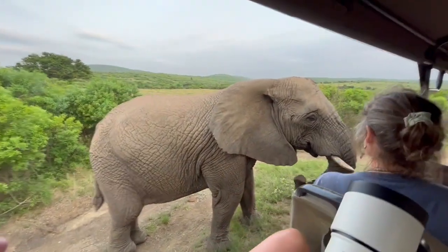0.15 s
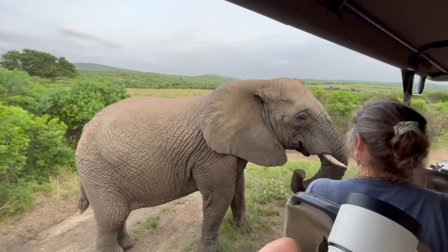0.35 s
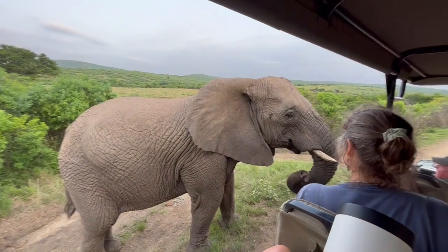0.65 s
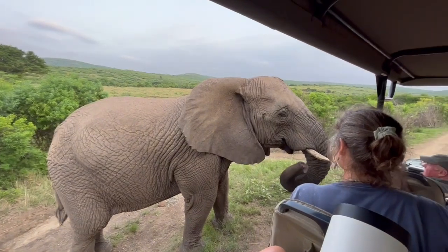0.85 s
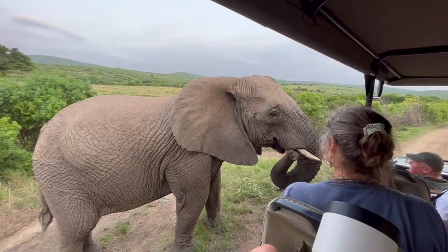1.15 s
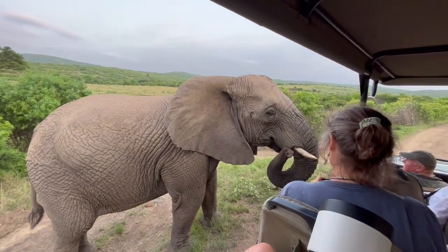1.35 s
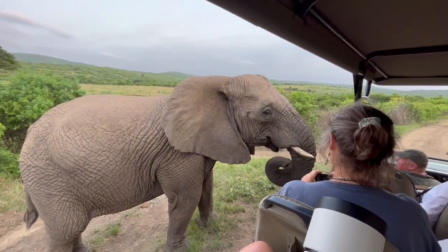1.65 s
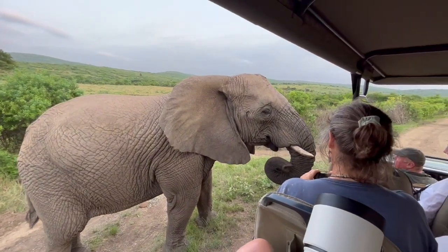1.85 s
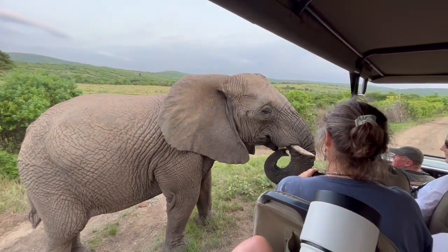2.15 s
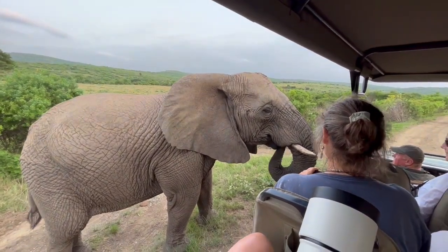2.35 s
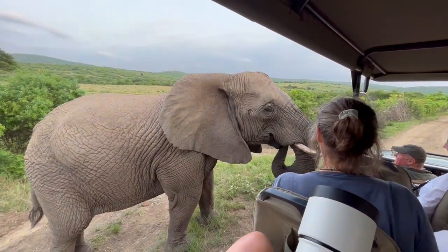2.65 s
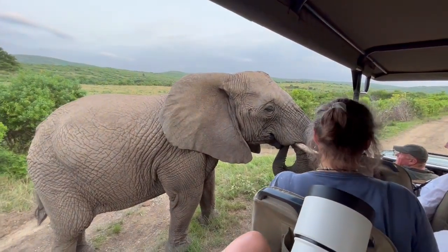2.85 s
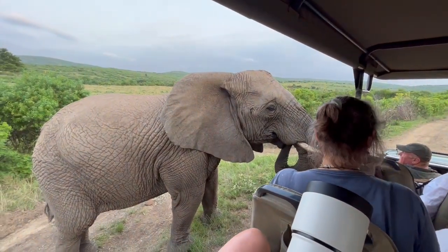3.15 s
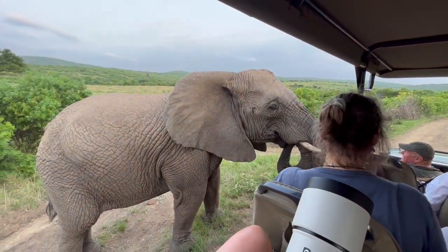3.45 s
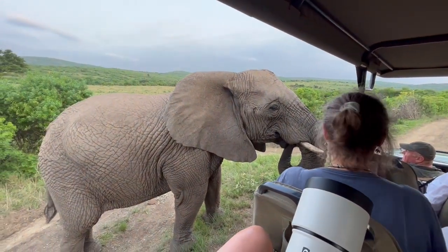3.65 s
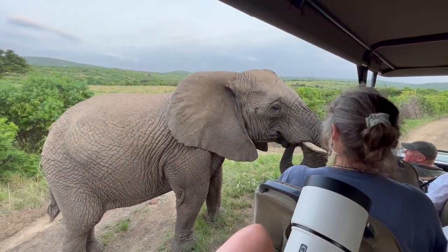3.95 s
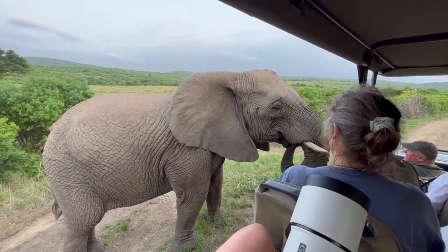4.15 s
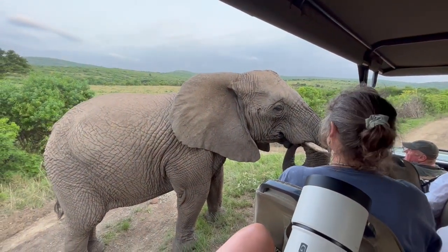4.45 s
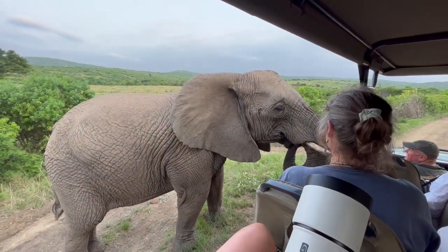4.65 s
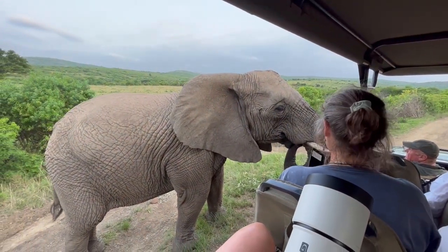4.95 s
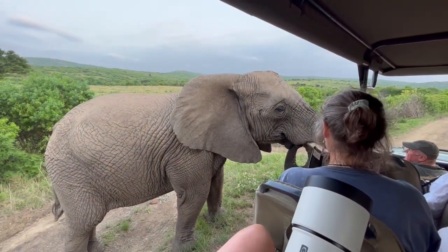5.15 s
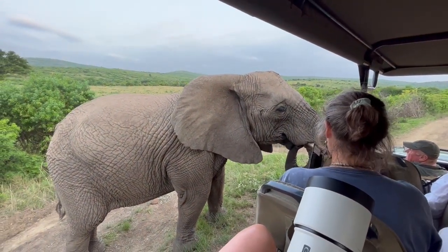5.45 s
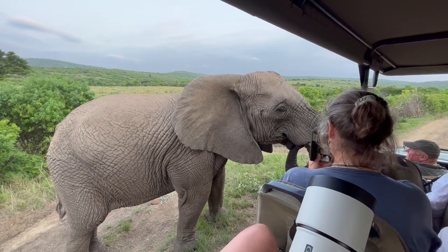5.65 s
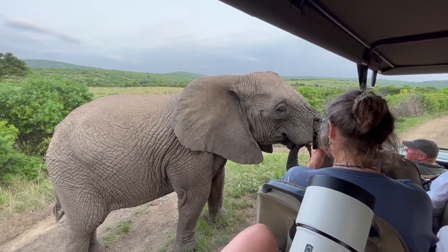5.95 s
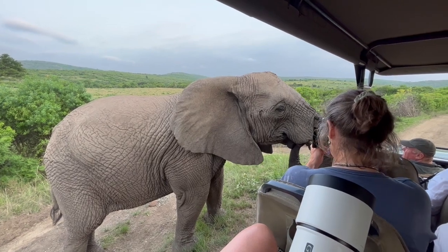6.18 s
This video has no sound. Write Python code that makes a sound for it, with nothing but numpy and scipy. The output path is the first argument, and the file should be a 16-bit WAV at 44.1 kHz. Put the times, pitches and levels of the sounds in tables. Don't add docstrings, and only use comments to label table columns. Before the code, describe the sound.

Low rumbling engine idle runs down with soft thumps, a near bird whistling downward, then quiet bush hiss, cloth rustle and a crisp shutter.

```python
import sys
import numpy as np
from scipy import signal
from scipy.fft import rfft, irfft, next_fast_len
from scipy.io import wavfile
from scipy.ndimage import uniform_filter1d, map_coordinates

SR = 44100
rng = np.random.default_rng(int(sys.argv[2]) if len(sys.argv) > 2 else 0)


def invert_db(level):
    return 10 ** (np.asarray(level, dtype=float) / 20)


def unload_wav(signal):
    wavfile.write(
        sys.argv[1],
        SR,
        np.round(np.clip(np.atleast_2d(signal).T, -1, 1) * 32767).astype(np.int16),
    )


N = 278403

IDLE_HZ = 38.15
CYLINDERS = 6
LEAD = 8192

# frequency in Hz, correlation.
BUSH_ALIKE = [(60, .75), (150, .74), (240, .57), (370, .26), (600, -.2), (1400, -.22), (2400, .17),
              (3500, -.12), (5000, .1), (6600, -.4), (8000, .3), (10500, .45), (12500, .4), (14400, 0)]


def unit(x):
    return x / np.sqrt(np.mean(x ** 2) + 1e-20)


def along(points, hz):
    f, v = np.transpose(points)
    return np.interp(np.log(hz + 1), np.log(f + 1), v)


def wobble(rate_hz):
    knots = rng.standard_normal(int(N * rate_hz / SR) + 4)
    return map_coordinates(knots, [np.arange(N) * rate_hz / SR])


def filtered(x, response):
    m = next_fast_len(N + SR)
    return irfft(rfft(x, m) * response(np.fft.rfftfreq(m, 1 / SR)), m)[..., :x.shape[-1]]


def causal(points):
    def response(hz):
        cepstrum = irfft(np.log(invert_db(along(points, hz))))
        cepstrum[1:len(hz) - 1] *= 2
        cepstrum[len(hz):] = 0
        return np.exp(rfft(cepstrum))
    return response


def rush(spectrum, alike, patchy_db):
    z = signal.stft(rng.standard_normal((2, N + 512)), nperseg=512)[2]
    field = uniform_filter1d(rng.standard_normal(z.shape[1:]), size=6, axis=0)
    field = unit(uniform_filter1d(field, size=8, axis=1))
    fade = np.linspace(1, 0, len(field))[:, None] ** 2
    pair = signal.istft(z * invert_db(patchy_db * field * fade), nperseg=512)[1][:, :N]

    def mid_side(hz):
        turn = np.arccos(np.clip(along(alike, hz), -1, 1)) / 2
        return invert_db(along(spectrum, hz)) * [np.cos(turn), np.sin(turn)]

    mid, side = filtered(pair, mid_side)
    return np.array([mid + side, mid - side]) / np.sqrt(np.mean(mid ** 2) + 1e-20)


def panned(x, pan_db):
    return x * invert_db(np.array([[pan_db / 2], [-pan_db / 2]]))


def swells(rows, lift_db=0.0):
    s, db, rise, fall = np.transpose(rows)[:4, :, None]
    steps = np.arange(0, N + 64, 64)
    t = steps / SR - s
    level_db = db + lift_db - 10 * np.where(t < 0, -t / np.abs(rise), t / np.abs(fall))
    return np.interp(np.arange(N), steps, np.sqrt(np.sum(invert_db(2 * level_db), axis=0)))


def early(curve):
    return np.pad(curve, (LEAD, 0), "edge")


def crank():
    key_off_s, coast_s, stall_s, stalling_s = 1.852, .64, 2.4, .17
    t = np.arange(N) / SR
    speed_hz = IDLE_HZ * np.exp(-np.maximum(t - key_off_s, 0) / coast_s)
    return speed_hz, np.clip((stall_s - t) / stalling_s, 0, 1)


def firings(speed_hz):
    phase = np.cumsum(early(speed_hz * (1 + .001 * wobble(4)))) / SR
    at = np.flatnonzero(np.diff(np.floor(phase)))
    cylinder = np.arange(len(at)) % CYLINDERS
    uneven, chance = rng.standard_normal((2, CYLINDERS)), rng.standard_normal((len(at), 2))
    gas, knock = np.zeros((2, N + LEAD))
    slowing = IDLE_HZ / early(speed_hz)[at]
    gas_db = .7 * unit(uneven[0])[cylinder] + (.3 + 3 * np.log(slowing)) * chance[:, 0]
    gas[at] = slowing ** .8 * invert_db(gas_db)
    knock[at] = invert_db(6 * unit(uneven[1])[cylinder] + chance[:, 1])
    return phase[LEAD:], gas, knock


def exhaust(gas, push):
    # frequency in Hz, gain in dB.
    pipe = [(15, -75), (38, -34), (48, -15), (60, -8), (76, 0), (90, -7), (114, -15), (153, -22),
            (190, -35), (230, -38), (420, -48), (800, -75), (1500, -120)]
    lag = 21
    steady, driven = filtered(np.array([gas, gas * early(push)]), causal(pipe))
    pair = np.array([driven[LEAD - lag:-lag], driven[LEAD:]])
    return pair / np.std(steady[SR // 2:3 * SR // 2])


def panels(knock, push):
    # centre in Hz, width in Hz, level in dB.
    modes = [(267, 16, -4), (318, 14, 0), (372, 16, -3), (435, 16, -9)]

    def ring(f):
        total = 0
        for k, (c, w, db) in enumerate(modes):
            total = total + (-1) ** k * invert_db(db) * 1j * f * w / (c * c - f * f + 1j * f * w)
        return total

    struck, driven = filtered(np.array([knock, knock * early(push)]), ring)[:, LEAD:]
    return invert_db(-32.0) * driven / np.std(struck[SR // 2:3 * SR // 2])


def singing(turns, speed_hz, push):
    # crank-cycle multiple, level in dB.
    tones = [(31, -58), (42, -55), (45, -59), (46, -59), (50, -48.5), (54, -59), (60, -45), (61, -58),
             (68, -62), (90, -65), (104, -64), (136, -65)]
    tuned = push ** 0.43 * invert_db(4.5) / (1 + ((speed_hz / IDLE_HZ - 1) / 0.013) ** 2)
    song = np.zeros(N)
    for k, db in tones:
        angle = 2 * np.pi * (k * turns / CYLINDERS + rng.random())
        song += invert_db(db + 3 + 1.2 * wobble(5)) * np.sin(angle)
    return tuned * song


def shaking(turns, slowed, turning):
    # peak in seconds, clatter in dB,
    # rise and fall in seconds per 10 dB, roar over clatter in dB.
    stirs = [(0, -46.5, .03, 0.12, 10.5), (.04, -51.5, .03, .5, 1), (2.419, -48, 0.15, 0.1165, 13),
             (2.52, -55.5, 0.12, 0.28, 3.5), (2.83, -54, 0.098, 0.19, -6), (2.96, -62.5, 0.115, 0.45, -20),
             (3.45, -64, 0.093, 0.23, -5), (3.85, -70, 0.11, .5, 3.5), (4.53, -56.5, 0.0082, -0.0142, -10),
             (4.82, -71.5, 0.099, -0.55, -5), (4.95, -74, 0.036, -0.3, -7),
             (5.202, -50.5, 0.031, 0.0037, -7), (5.45, -71.5, 0.17, 0, -5), (5.68, -73, 0.038, 0.17, 1.5),
             (5.89, -69.5, 0.073, 0.2, 6), (6.01, -73, 0.058, -0.03, 13.5)]
    # frequency in Hz, density in dB per Hz.
    clatter_tone = [(330, -16), (560, -7), (636, -2.5), (978, -3.5), (1220, 0), (1390, -4.5), (1540, -3),
                    (2600, -11), (4750, -16.5), (5340, -18.5), (8300, -24.5), (9000, -20.5), (11700, -28),
                    (19800, -120)]
    # frequency in Hz, density in dB per Hz.
    roar_tone = [(25, -39.5), (50, 0), (90, 10), (130, 3), (200, -5.5), (300, 2), (450, -6.5), (700, -11),
                 (1500, -120)]
    # frequency in Hz, correlation.
    engine_alike = [(60, .98), (130, .97), (290, .75), (630, .3), (1370, -.1), (3000, 0), (14400, .2)]
    t = np.arange(N) / SR
    running = invert_db(-46.5 - 1.5 * t) * slowed ** 2.2 * turning
    rattle = np.hypot(running, swells(stirs) + invert_db(-84.5))
    boom = np.hypot(invert_db(-41.5) * slowed ** 2.5 * turning, swells(stirs, np.array(stirs)[:, 4:]))
    beat_db = 1.5 * np.cos(2 * np.pi * turns) + .8 * np.cos(2 * np.pi * turns / CYLINDERS)
    beat = unit(invert_db(beat_db + .8 * wobble(16)))
    clatter = invert_db(1) * rattle * beat * rush(clatter_tone, engine_alike, patchy_db=1)
    return clatter + invert_db(1.5) * boom * rush(roar_tone, engine_alike, patchy_db=1.5)


def engine():
    # time in seconds, level in dB.
    idle_push = [(0, -24), (.12, -25), (.39, -20.5), (.78, -19.5), (1.66, -20.5), (1.9, -22)]
    unfired_s, unfired_db = 2.1, -2
    speed_hz, turning = crank()
    t, slowed = np.arange(N) / SR, speed_hz / IDLE_HZ
    turns, gas, knock = firings(speed_hz)
    push_db = np.interp(t, *np.transpose(idle_push)) + unfired_db * (t > unfired_s)
    push = invert_db(push_db) * slowed ** 1.68 * turning
    body = panels(knock, push) + singing(turns, speed_hz, push)
    return exhaust(gas, push) + panned(body, 0.25) + shaking(turns, slowed, turning)


def gliding_notes(rows, pan_db, swell):
    out = np.zeros(N + SR)
    for s, length_s, first_hz, last_hz, db in rows:
        u = np.linspace(0, 1, round(length_s * SR))
        hz = first_hz + (last_hz - first_hz) * (.72 * u + .18 * u ** 2 + .1 * u ** 12)
        shape = np.sin(np.pi * u ** swell) ** .6
        out[round(s * SR):][:len(u)] += invert_db(db + 3) * shape * np.sin(2 * np.pi * np.cumsum(hz) / SR)
    tail = rng.standard_normal((2, SR // 5)) * invert_db(-60 * np.arange(SR // 5) / SR / 0.061)
    echo = signal.fftconvolve(out[None], tail / np.linalg.norm(tail[0]), axes=1)[:, :N]
    return panned(out[:N], pan_db) + invert_db(-6) * echo


def birds():
    # start in seconds, length in seconds, first Hz, last Hz, level in dB.
    whistles = [
        (1.69, .07, 5200, 3850, -61),
        (1.862, .106, 5650, 3950, -57),
        (2.065, .108, 5700, 3900, -49),
        (2.258, .113, 6000, 4050, -45.5),
        (2.463, .125, 6150, 3750, -42.5),
    ]
    # start in seconds, length in seconds, first Hz, last Hz, level in dB.
    pips = [(3.075, .03, 2480, 2400, -63), (3.71, .025, 2430, 2350, -66), (4.025, .03, 2420, 2330, -63),
            (4.34, .03, 2420, 2320, -63), (4.65, .03, 2420, 2320, -63), (4.97, .025, 2440, 2360, -68),
            (5.925, .03, 2520, 2380, -60), (6.25, .03, 2400, 2300, -61), (6.065, .03, 3300, 3950, -61),
            (6.135, .02, 3700, 3100, -64), (6.172, .02, 3900, 3850, -61), (5.96, .06, 2700, 2750, -66),
            (2.29, .04, 1700, 1680, -58), (2.355, .03, 1720, 1700, -55), (2.565, .03, 1600, 1600, -56),
            (2.83, .03, 1320, 1310, -59), (2.74, .1, 1060, 1050, -63), (3.05, .45, 1075, 1065, -71)]
    near = gliding_notes(whistles, pan_db=1.5, swell=1.6)
    return near + invert_db(-2) * gliding_notes(pips, pan_db=1.5, swell=.8)


def knocks():
    # start in seconds, peak in dB, centre in Hz, t60 in seconds.
    blows = [(2.265, -29, 85, .25), (2.322, -33, 75, .2), (2.33, -38, 290, .15), (2.365, -35, 300, .12),
             (2.372, -22, 70, .17), (2.412, -32, 290, .12), (2.415, -20.5, 85, .17), (2.46, -33, 75, .3),
             (2.445, -38, 300, .1), (2.512, -25, 92, .17), (2.59, -28, 88, .14), (2.61, -45, 400, .06),
             (2.65, -35, 77, .9), (2.79, -52, 1000, .05), (2.84, -46, 1100, .05), (2.86, -50, 1200, .05),
             (1.86, -41, 315, .7), (1.99, -45, 365, .5), (2.895, -54, 600, .05), (3.8, -60, 400, .06),
             (4.525, -59, 300, .08), (5.13, -45, 720, .13), (5.2, -57, 350, .12), (5.455, -55, 480, .06),
             (5.5, -52, 155, .3), (5.67, -57, 500, .05), (5.895, -48, 320, .08), (5.995, -50, 270, .1)]
    out, t = np.zeros(N + SR), np.arange(SR // 2) / SR
    hz = np.fft.rfftfreq(len(t), 1 / SR)
    for s, db, centre_hz, t60_s in blows:
        colour = 1 / (1 + (np.log((hz + 1) / centre_hz) / .42) ** 4)
        puff = unit(irfft(rfft(rng.standard_normal(len(t))) * colour))
        ring = np.sin(2 * np.pi * centre_hz * t) + min(.7, .1 / t60_s) * puff
        out[round(s * SR):][:len(t)] += invert_db(db - 60 * t / t60_s) * (1 - np.exp(-t / 0.0028)) * ring
    return panned(out[:N], .5)


def clicks():
    # start in seconds, peak in dB, centre in Hz, t60 in seconds, L-R in dB.
    shutter = [
        (5.1268, -32, 7000, .05, 1.5),
        (5.133, -33, 3500, .07, 1.5),
        (5.143, -37, 2500, .09, 1.5),
        (5.1736, -28, 7500, .045, 0),
        (5.180, -27, 7500, .035, 0),
        (5.186, -35, 3000, .09, 0),
        (5.1985, -29, 5500, .06, 0),
        (5.205, -33, 5500, .08, 0),
    ]
    # start in seconds, peak in dB, centre in Hz, t60 in seconds, L-R in dB.
    contacts = [(4.513, -48, 4000, .06, 3), (4.524, -37.5, 3000, .03, 2), (4.529, -40, 6000, .07, 2),
                (4.158, -47, 2200, .05, 0), (3.884, -47, 5800, .04, 3), (3.917, -46, 5400, .04, 3),
                (5.354, -45, 5800, .03, 2.5), (5.46, -53, 5000, .03, 2), (5.694, -51, 5800, .04, 1.5),
                (2.375, -42, 3000, .12, 0), (3.58, -51, 5000, .05, 2)]
    out, t = np.zeros((2, N + SR)), np.arange(4096) / SR
    hz = np.fft.rfftfreq(len(t), 1 / SR)
    for s, db, centre_hz, t60_s, pan_db in shutter + contacts:
        shared, own = rng.standard_normal((2, len(t)))
        colour = 1 / (1 + (np.log((hz + 1) / centre_hz) / .8) ** 2)
        colour = colour * (hz > 650) / (1 + (hz / 12000) ** 6)
        burst = unit(irfft(rfft(shared + 0.75 * np.array([own, -own])) * colour))
        out[:, round(s * SR):][:, :len(t)] += panned(invert_db(db - 4.5 - 60 * t / t60_s) * burst, pan_db)
    return out[:, :N]


def cloth():
    # peak in seconds, level in dB, rise and fall in seconds per 10 dB.
    shifts = [
        (0, -56.5, .1, 0.83),
        (1.1, -61.5, 2.4, 1.55),
        (2.33, -58, .4, 0.34),
        (3.0, -68, 0.7, 0.5),
        (3.46, -64.5, 0.46, 0.6),
        (3.93, -66.5, 0.05, 0.76),
        (5.18, -55.5, 0.23, 0.2),
        (5.94, -59, 0.17, 0.13),
        (6.12, -68.5, 0.16, .3),
    ]
    # frequency in Hz, density in dB per Hz.
    rustle_tone = [(410, -28.5), (700, -16.5), (942, -4), (1100, -5.5), (2190, -6.5), (2410, -6),
                   (3090, -4.5), (5740, 1), (10400, -6.5), (12000, -3.5), (15600, -19.5), (22000, -120)]
    grains = unit(invert_db(1.06 * wobble(150) + 1.1 * wobble(16)))
    level = invert_db(5) * np.hypot(swells(shifts), invert_db(-77.5))
    return level * grains * rush(rustle_tone, BUSH_ALIKE, patchy_db=4.0)


def drone():
    # peak in seconds, level in dB, rise and fall in seconds per 10 dB.
    hums = [
        (2.45, -42.5, 0.24, 0.58),
        (3.75, -60.5, 1, 2.2),
        (5.4, -67, 0.2, .6),
        (5.9, -63, 0.34, -0.3),
        (6.12, -69.5, 0.16, -0.3),
    ]
    # frequency in Hz, density in dB per Hz.
    drone_tone = [(15, -41), (40, -5.5), (64, -2), (76, 2.5), (92, -6.5), (108, -8.5), (125, -9.5),
                  (158, 1), (180, -9.5), (200, -11.5), (260, -25.5), (570, -120)]
    hum = np.hypot(invert_db(-37.5 - 5.5 * np.arange(N) / SR) * crank()[1], swells(hums))
    return hum * invert_db(.8 * wobble(9)) * rush(drone_tone, BUSH_ALIKE, patchy_db=.5)


def insects():
    # frequency in Hz, density in dB per Hz.
    hiss_tone = [(120, -46), (200, -10.5), (516, -13), (629, -48.5), (883, -15), (983, -11.5), (1380, -1.5),
                 (2410, -7.5), (2830, -20.5), (4260, -20), (8420, -15.5), (12300, 5), (14400, -5.5)]
    return invert_db(-56.5 + 0.23 * wobble(6)) * rush(hiss_tone, BUSH_ALIKE, patchy_db=4.0)


def scene():
    return engine() + birds() + knocks() + clicks() + cloth() + drone() + insects()


def top_cut(x):
    return signal.sosfilt(signal.butter(12, 15000, fs=SR, output="sos"), x)


def record(dry):
    # frequency in Hz, L-R in dB.
    ports = [(60, 0), (91, -0.5), (140, 0), (210, -1.5), (320, 1), (490, -0.5), (750, -4.5), (1150, 3.5),
             (1750, 2.5), (2670, -1), (4070, 5.5), (6200, 7.5), (9450, -5.5), (14400, 1)]
    mono_hz = (11450, 12450)
    top_hz = 14700
    left, right = filtered(dry, lambda hz: invert_db(along(ports, hz) * np.array([[.5], [-.5]])))

    def limits(hz):
        return np.array([1 / (1 + (hz / top_hz) ** 70), (hz < mono_hz[0]) | (hz > mono_hz[1])])

    mid, side = filtered(np.array([left + right, left - right]) / 2, limits)
    return top_cut(np.array([mid + side, mid - side]))


dry = scene()
out = record(dry)
unload_wav(out)
```